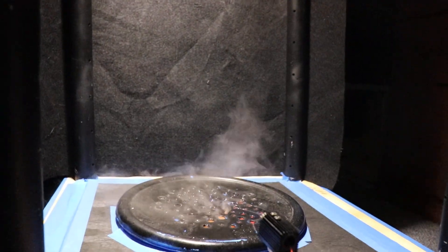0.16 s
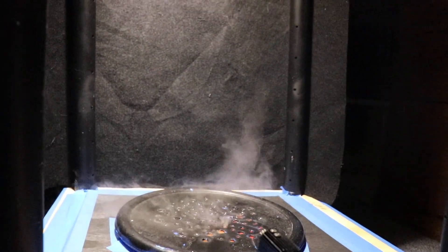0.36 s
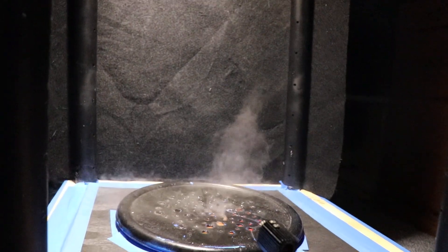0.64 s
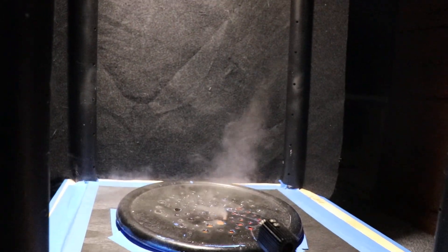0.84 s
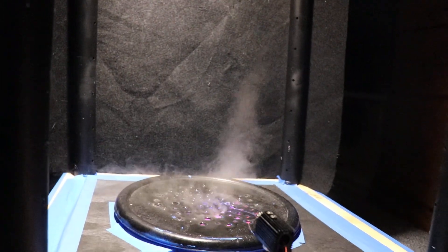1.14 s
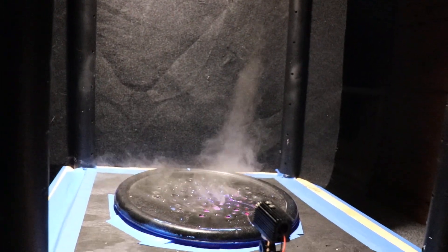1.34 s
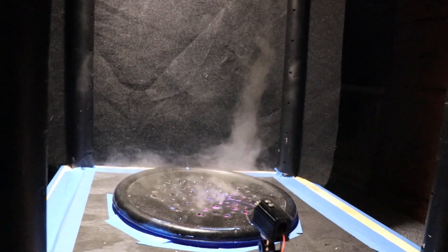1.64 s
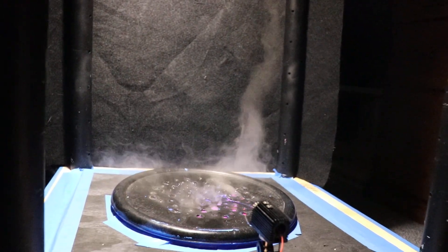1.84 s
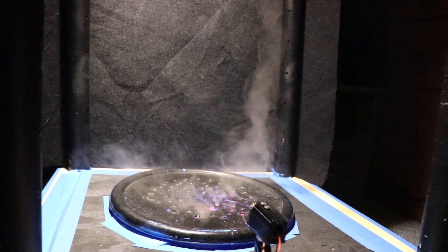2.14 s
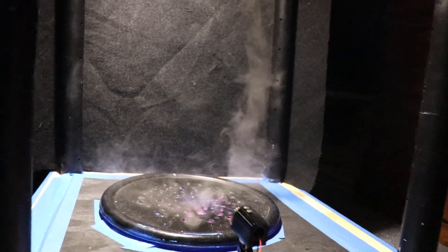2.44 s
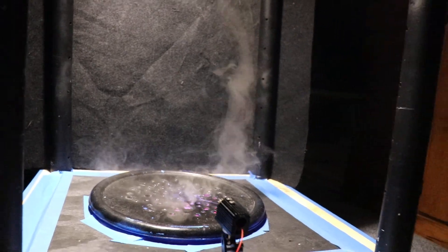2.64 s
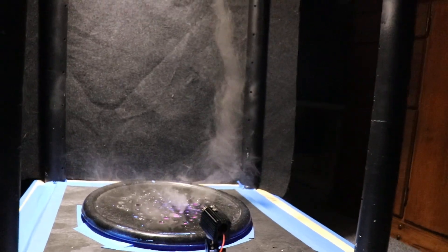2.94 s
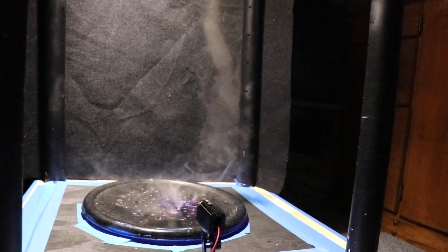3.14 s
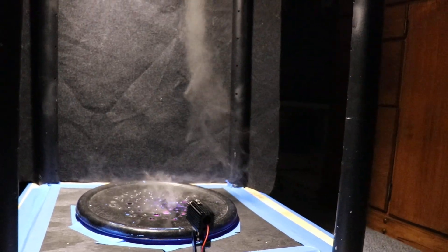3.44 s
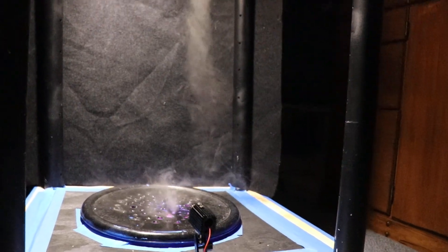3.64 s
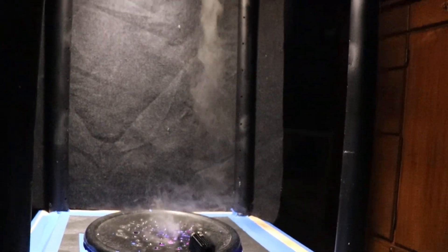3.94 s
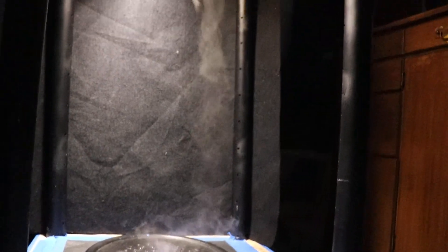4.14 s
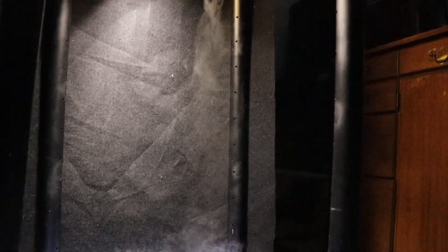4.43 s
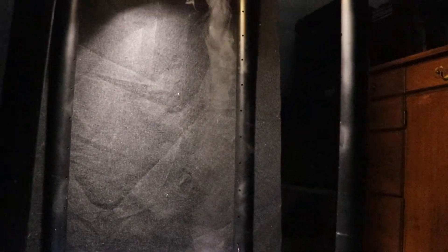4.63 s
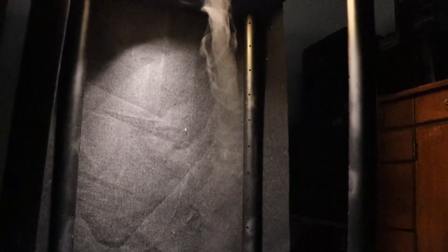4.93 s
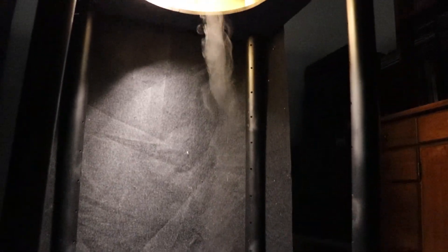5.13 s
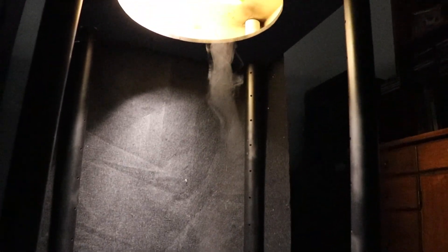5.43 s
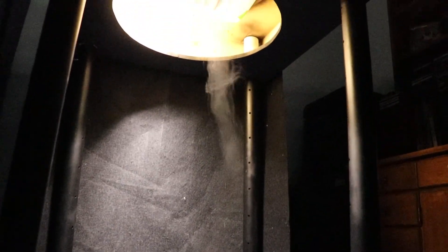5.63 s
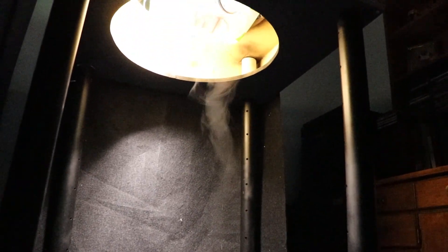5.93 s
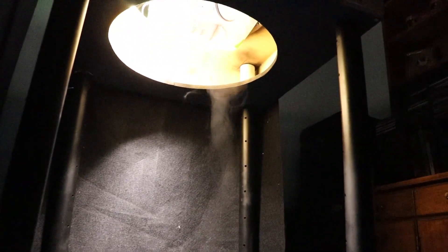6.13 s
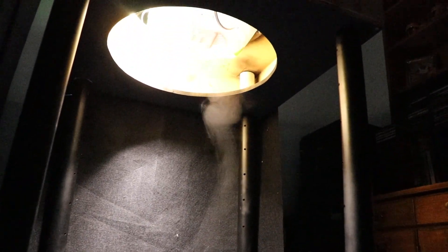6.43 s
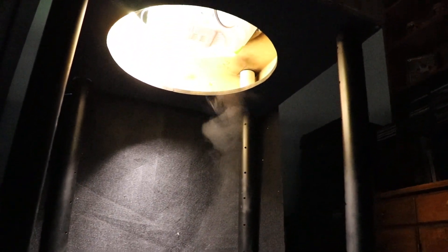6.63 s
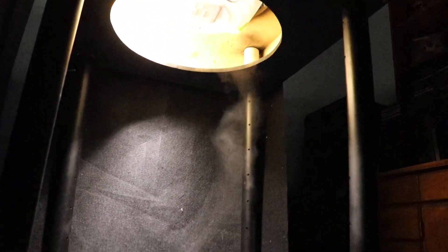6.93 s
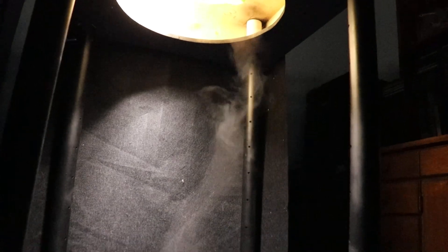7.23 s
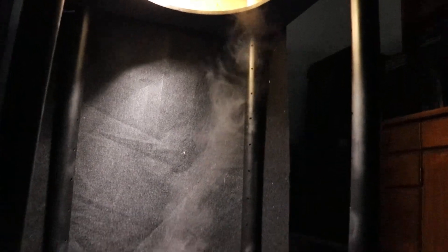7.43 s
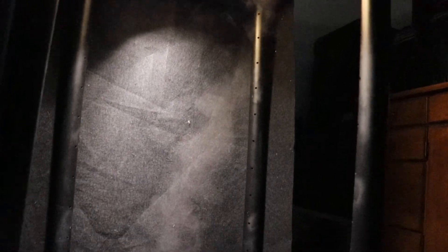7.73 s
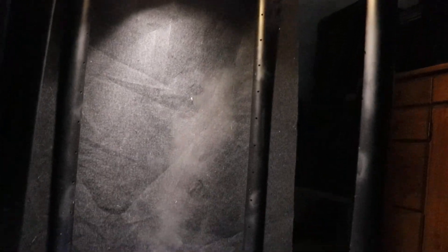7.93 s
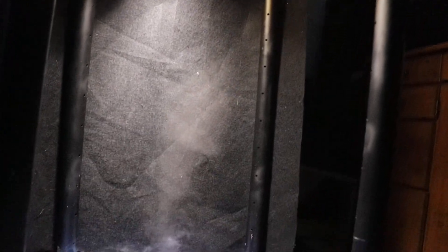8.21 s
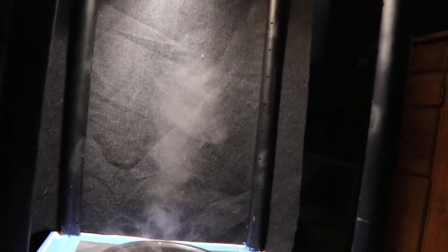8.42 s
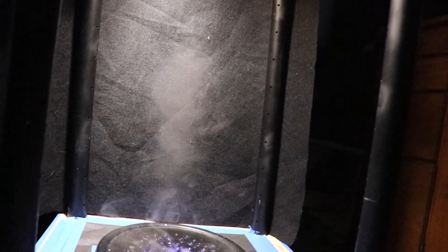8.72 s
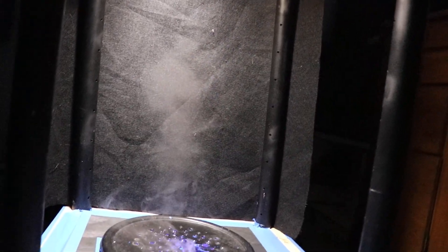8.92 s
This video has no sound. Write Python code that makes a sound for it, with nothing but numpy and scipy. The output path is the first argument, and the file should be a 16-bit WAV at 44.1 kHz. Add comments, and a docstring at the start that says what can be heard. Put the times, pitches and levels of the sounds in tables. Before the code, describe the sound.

A fan machine runs evenly in a room, whooshing and humming with soft hiss on top. A hard, loud double click switches it off, followed by a faint dull release. The rotor coasts down, its tones gliding lower into near quiet. Irregular watery plinks and dry ticks emerge, while a faint hollow drone grows as the handheld microphone moves toward the chamber top, then back.

```python
"""A homemade fog tornado indoors: a seven-blade fan draws mist up from a basin with an ultrasonic atomiser.
From the start, shaped noise and blade tones make the fan, over mains hum, room rumble and thin spray hiss.
Droplets keep falling back: short noise bursts tick on the lid, ringing bubbles plink in the water.
Near 2 s a double click of noise bursts through housing resonances switches the fan off; its noises and
tones sink as it coasts to rest at 9 s, while a hollow drone of narrow noise rises and handling bumps pass."""
import sys
import numpy as np
from scipy import signal
from scipy.fft import rfft, irfft
from scipy.io import wavfile

SR = 44100
rng = np.random.default_rng(int(sys.argv[2]) if len(sys.argv) > 2 else 0)


def int16_out(signal):
    """Quantize to a 16-bit WAV file."""
    q = np.round(np.clip(np.atleast_2d(signal).T, -1, 1) * 32767)
    wavfile.write(sys.argv[1], SR, q.astype(np.int16))


N = 399987
T = np.arange(N) / SR
CUTOFF_HZ = 15800   # top of the sound's band

# individually placed droplets that trap a bubble in the basin, level before the trims in drips():
# start_s [s], level_db [dB peak], bubble_hz [Hz]
DROPLETS = [(2.697, -36.5, 5350), (3.004, -34.5, 2620), (3.079, -33, 4910), (3.659, -36.5, 1700),
            (3.851, -36.5, 1693), (4.117, -27, 3310), (4.247, -34.5, 5270), (4.279, -37.5, 2190),
            (4.360, -36, 3420), (4.457, -39, 3460), (4.928, -43.5, 2110), (5.161, -38, 1660),
            (5.176, -35, 5310), (5.379, -37, 2300), (5.432, -32, 3120), (5.569, -38, 3580),
            (5.596, -37, 5280), (5.669, -39, 2400), (5.812, -32, 3400), (6.308, -40.5, 3120),
            (6.351, -41, 1620), (6.569, -36, 2320), (6.658, -41, 2220), (6.744, -43, 5200),
            (7.013, -38.5, 2390), (7.055, -38, 2400), (7.225, -38.5, 2390), (7.254, -31, 3560),
            (7.423, -41.5, 5270), (7.600, -42, 1754), (7.734, -41, 5700), (7.860, -43.5, 2210),
            (8.309, -38.5, 2050), (8.508, -36, 5200), (8.952, -38, 2320), (9.017, -38.5, 6320)]


def from_db(db):
    """Decibels to an amplitude factor."""
    return 10 ** (np.asarray(db) / 20)


def rms_one(x):
    """Scale a sound to rms 1."""
    return x / np.sqrt(np.mean(x ** 2) + 1e-20)


def in_time(rows):
    """A curve of (s, value) rows at every sample."""
    return np.interp(T, *np.transpose(rows))


def add(out, s, sound):
    """Mix a short sound in at time s."""
    i = int(np.clip(round(s * SR), 0, N - 1))
    out[i:i + len(sound)] += sound[:N - i]


def noise(spectrum):
    """Noise of rms 1 coloured by (Hz, relative dB) rows, falling away beyond its ends."""
    hz, db = np.transpose(spectrum)
    f = np.maximum(np.arange(N // 2 + 1) * SR / N, 1)
    skirts = np.minimum(f / hz[0], 1) ** 2 * np.minimum(hz[-1] / f, 1) ** 2
    colour = from_db(np.interp(np.log(f), np.log(hz), db))
    white = rfft(rng.standard_normal(N))
    return rms_one(irfft(white * skirts * colour, N))


def drift(rate_hz):
    """Random wandering of rms 1, mostly slower than the rate."""
    f = np.arange(N // 2 + 1) * SR / N
    return rms_one(irfft(rfft(rng.standard_normal(N)) / (1 + (f / rate_hz) ** 2), N))


def resonate(x, hz, width_hz):
    """A two-pole resonance with a gain of about 1 at its centre."""
    r, w = np.exp(-np.pi * width_hz / SR), 2 * np.pi * min(hz, CUTOFF_HZ) / SR
    zeros = np.array([1, 0, -1]) * (1 - r * r) / 2
    poles = [1, -2 * r * np.cos(w), r * r]
    return signal.lfilter(zeros, poles, x + 1e-18)


def tone(hz, waver_db):
    """A sine of rms 1 on a fixed or moving pitch, wavering in level around that."""
    phase = 2 * np.pi * (np.cumsum(hz * np.ones(N)) / SR + rng.random())
    return np.sqrt(2) * np.sin(phase) * from_db(waver_db * drift(0.93))


def fan():
    """Air drag slows the rotor once the power is cut; each part falls as a power of its speed."""
    off_s, coast_s, turns_hz = 1.982, 1.8, 48.68   # power cut, time to half speed, full shaft rate
    # blade tones at full speed: order [multiple of the shaft rate], level_db [dB rms]
    fan_orders = [(2, -46.5), (7, -38.5)]
    # motor whine while powered: pitch_hz [Hz], level_db [dB rms]
    motor_tones = [(430, -65), (600.5, -50), (828.3, -46.5), (948.3, -47.5), (1200, -54), (2632, -56)]
    # colour of the air through the chamber: freq_hz [Hz], level_db [relative dB]
    whoosh_colour = [(70, -19), (140, -13.5), (205, -9.5), (240, -0.5), (288, 1), (350, -7.5), (385, -3),
                     (440, -3), (500, -10), (720, -9.5), (860, -15.5), (1000, -13.5), (1250, -20),
                     (1900, -59)]
    # colour of the hiss at the blade tips: freq_hz [Hz], level_db [relative dB]
    hiss_colour = [(900, -20), (1400, 0.5), (1800, -1), (2150, -3.5), (2650, -0.5), (3400, 0.5),
                   (4000, -3.5), (4600, -10), (5500, -11), (6300, -16), (7500, -24), (10000, -26.5),
                   (16000, -32)]
    # blade overtones: order [multiple of the shaft rate]
    overtone_orders = [21, 28, 35]

    speed = 1 / (1 + np.maximum(T - off_s, 0) / coast_s)
    speed = speed * np.clip((9 - T) / 5, 0, 1)   # bearing friction finally stops it

    # noise levels are dB rms at full speed, here with gusts and flutter
    whoosh = from_db(-30 + 0.5 * drift(16)) * noise(whoosh_colour) * speed ** 2.8
    hiss = from_db(-37.5 + 1.0 * drift(10)) * noise(hiss_colour) * speed ** 3.46

    # even a weak draught keeps the air column humming
    column_hz = 257
    column = resonate(rng.standard_normal(N), column_hz, width_hz=23)
    column = rms_one(resonate(column, column_hz, width_hz=79))
    column = from_db(-42) * column * speed ** 1.4

    shaft_hz = turns_hz * speed * (1 + 0.00055 * drift(0.84))
    blades = sum(from_db(db) * tone(round(k) * shaft_hz, waver_db=1.5) for k, db in fan_orders)
    blades = blades * speed ** 4.5

    powered = np.clip((off_s - T) / 0.082 + 1, 0, 1)   # fades over 82 ms
    whine = powered * sum(from_db(db) * tone(hz * (1 + 0.00065 * drift(5.7)), waver_db=1.5)
                          for hz, db in motor_tones)

    # turbulence shakes the overtones' pitch as they sink through a resonance of the chamber
    overtones = sum(tone(k * shaft_hz * (1 + 0.0079 * drift(25.3)), waver_db=4.0) for k in overtone_orders)
    overtones = overtones * speed ** 1.9
    for _ in range(2):
        overtones = resonate(overtones, hz=860, width_hz=500)
    overtones = from_db(-54) * overtones
    return whoosh + hiss + column + blades + overtones + whine


def background():
    """Room rumble, air hiss and steady hums, a hollow drone of narrow noise, and soft handling bumps."""
    # rumble colour: freq_hz [Hz], level_db [relative dB]
    room_colour = [(12, 15.5), (19, 8), (29, -9), (80, -4), (140, -2), (210, -10), (275, -3.5), (350, -9),
                   (435, -6), (490, -6), (570, -5), (720, -8.5), (830, -18), (1500, -31.5)]
    # thin room hiss colour: freq_hz [Hz], level_db [relative dB]
    air_colour = [(600, -21), (1000, 4.5), (1500, 1.5), (2200, 1), (3500, -0.5), (4500, -4.5), (5400, -2),
                  (7000, -6.5), (9500, -7), (12000, -8.5), (16000, -8.5)]
    # mains hum and a slow appliance motor: pitch_hz [Hz], level_db [dB rms]
    hum_tones = [(39.4, -51.5), (59.9, -49.5), (180, -62.5), (300, -69), (420, -61.5), (900, -73.5),
                 (1020, -80), (1260, -82), (1380, -89), (1500, -86)]
    # hum near 120 Hz stands in the room, so its level changes with position: time_s [s], level_db [dB rms]
    buzz_curve = [(0, -59), (2.3, -56), (3, -52), (4.4, -56), (5.5, -54), (8, -51.5), (9.07, -60)]
    # drone, heard best near the top of the chamber: time_s [s], level_db [dB]
    drone_curve = [(0, -78), (3.9, -64), (4.6, -54.5), (8.3, -56), (9.07, -61)]
    # handling rumble: centre_s [s], half_length_s [s], level_db [dB]
    bump_list = [(2.547, 0.089, -28), (2.888, 0.1, -35.5), (3.273, 0.083, -35), (4.304, 0.048, -38),
                 (6.63, 0.062, -37)]

    rumble = from_db(-45.5) * noise(room_colour)
    air = from_db(-57) * noise(air_colour)
    hum = sum(from_db(db) * tone(hz, waver_db=3.0) for hz, db in hum_tones)
    buzz = from_db(in_time(buzz_curve)) * tone(119.3, waver_db=1)

    drone_hz = 589
    drone = resonate(rng.standard_normal(N), drone_hz, width_hz=8.4)
    drone = rms_one(resonate(drone, drone_hz, width_hz=193))
    drone = from_db(in_time(drone_curve)) * drone

    bumps = sum(from_db(db) * np.exp(-((T - s) / length) ** 2) for s, length, db in bump_list)
    handling = bumps * noise([(8, -9), (18, 10), (40, -26)])
    return rumble + air + hum + buzz + drone + handling


def spray():
    """The atomiser's spray is a thin treble hiss that flickers."""
    # colour: freq_hz [Hz], level_db [relative dB]
    spray_colour = [(4000, -14), (7300, -4.5), (8600, -9), (9450, -1), (10000, -7), (10800, -3.5),
                    (11250, 0.5), (11900, -5), (12350, 2), (12700, -7), (14500, -6), (16000, -14)]
    # level before the flicker, louder close to the basin: time_s [s], level_db [dB rms]
    spray_curve = [(0, -63), (2, -61.5), (3, -61.5), (4.2, -62), (4.8, -66), (6, -75), (7.5, -71),
                   (8.4, -61.5), (9.07, -65)]
    return from_db(in_time(spray_curve) + 1.4 * drift(40)) * noise(spray_colour)


def shower(per_s, db, hz):
    """Small droplets at uneven moments, of varied size and pitch: rows of (s, level dB, Hz)."""
    size_spread_db, pitch_spread_octaves = 4.5, 0.86   # furthest stray either way
    count = 200
    wait, size, pitch = rng.random((count, 3)).T
    s = np.cumsum(2 * wait) / per_s
    level_db = db + size_spread_db * (2 * size - 1)
    pitch_hz = hz * 2 ** (pitch_spread_octaves * (2 * pitch - 1))
    return np.transpose([s, level_db, pitch_hz])[s < N / SR]


def rebounds():
    """A big drop throws up a smaller one, which falls back a moment later: rows of (s, level dB, Hz)."""
    s, db, hz = np.transpose(DROPLETS)
    wait, pitch = rng.random((len(s), 2)).T
    later_s = s + 0.017 * (.5 + wait)
    pitch_hz = hz * 2 ** (0.32 * (2 * pitch - 1))   # up to 0.32 octave either way
    return np.transpose([later_s, db - 11, pitch_hz])


def plink(hz, cycles, glide, swell_s, wobble):
    """A bubble swells and rings, peak near 1; churned water makes it wobble while its pitch shifts."""
    t, t60 = T[:SR // 12], cycles / hz
    churn = np.interp(t, t[::80], rng.standard_normal(len(t[::80])))
    envelope = (1 - np.exp(-t / swell_s)) * from_db(-60 * t / t60)
    phase = 2 * np.pi * np.cumsum(hz * (1 + glide * np.minimum(t / t60, 1))) / SR
    ring = np.sin(phase) + wobble * churn * np.sin(phase + np.pi / 3)
    return envelope / envelope.max() * ring / np.sqrt(1 + wobble ** 2)


def tick(hz, breadth, t60):
    """A short splat: a decaying noise burst resonating around one pitch; peak 1."""
    t = T[:SR // 14]
    spatter = rng.standard_normal(len(t)) * from_db(-60 * t / t60)
    sound = resonate(resonate(spatter, hz, breadth * hz), hz, 2.5 * hz)
    return sound / np.abs(sound).max()


def drips():
    """Droplets splash into the water and leave a ringing bubble; fainter ones spatter at random."""
    out = np.zeros(N)
    drops = [*DROPLETS, *rebounds(), *shower(per_s=7, db=-48, hz=3300)]
    chance = rng.standard_normal((len(drops), 2))
    for (s, db, hz), (damping_db, glide) in zip(drops, chance):
        cycles = 65 * from_db(damping_db)   # cycles until 60 dB down
        bubble = plink(hz, cycles, glide=0.042 * glide, swell_s=0.00086, wobble=0.21)
        splash = tick(hz, breadth=0.079, t60=0.028)
        add(out, s, from_db(db - 2.5) * bubble)
        add(out, s, from_db(db - 4) * splash)

    faint_per_s = 12
    for when, size, strength in rng.random((int(faint_per_s * N / SR), 3)):
        splat = tick(2000 * 3 ** size, breadth=0.29, t60=0.035)   # 2 to 6 kHz
        add(out, when * N / SR, from_db(-50 + 20 * (strength - .5)) * splat)
    return out


def lid_ticks():
    """Droplets that land on the lid make only a dry tick."""
    # individually placed ticks: start_s [s], level_db [dB peak], centre_hz [Hz]
    tick_list = [(.736, -31.5, 9900), (.838, -38, 14000), (.924, -32, 6660), (1.286, -36, 9600),
                 (2.727, -30, 9700), (3.001, -34, 7900), (4.103, -40, 10500), (4.323, -36, 9500),
                 (5.822, -31.5, 2780), (6.25, -38.5, 4400), (6.931, -34, 3230), (7.598, -42, 3500),
                 (7.793, -44, 3300), (8.286, -40, 2980)]
    out = np.zeros(N)
    for s, db, hz in [*tick_list, *shower(per_s=3.6, db=-46.5, hz=5400)]:
        add(out, s, from_db(db) * tick(hz, breadth=0.12, t60=0.0091))
    return out


def switch():
    """Each contact grinds for an instant, then its chatter dies away; both ring the plastic housing."""
    # contacts, pressed and let go: start_s [s], level_db [nominal peak dB], grind_s [s],
    # chatter_t60_s [s], brightness_hz [Hz]
    contacts = [(1.915, -21, 0.0018, .02, 6000), (1.9217, -7, 0.0011, 0.024, 9000),
                (1.950, -2.5, 0.002, 0.011, 8000), (2.189, -21, 0.0051, .015, 1200)]
    # housing resonances: pitch_hz [Hz], level_db [relative dB], t60_s [s]
    housing_modes = [(550, -11, 0.018), (736, -6, 0.022), (1310, -6, 0.018), (1940, 3, 0.0073),
                     (2200, 1, 0.008), (2860, 7.5, 0.0072), (3920, -4, 0.026), (4460, -10, 0.0048),
                     (5330, 3, 0.0082), (6270, 4, 0.0041), (7100, -17, .005), (7850, -22, .006),
                     (9050, -28, 0.0041), (9600, -13, 0.0038), (13000, -11, 0.0032), (14300, -21, 0.0027)]
    chatter, crest_db = 0.49, 6.5   # chatter strength beside the grind; allowance from peak to rms
    out, t = np.zeros(N), T[:SR // 10]
    for s, db, grind_s, t60, bright_hz in contacts:
        strength = np.where(t < grind_s, 1, chatter * from_db(-60 * (t - grind_s) / t60))
        sound = np.zeros(len(t))
        # every mode takes its own share of the blow's energy
        for hz, level_db, ring_s in housing_modes:
            force = rng.standard_normal(len(t)) * strength
            width_hz = np.log(1000) / np.pi / ring_s
            sound += from_db(level_db) * rms_one(resonate(force, hz, width_hz))
        # the bare crack of the contacts, beside the ring of the housing
        crack = resonate(rng.standard_normal(len(t)) * strength, hz=1700, width_hz=2200)
        sound += from_db(1) * rms_one(crack)
        # a soft contact is duller
        sound = signal.lfilter([1], [1, -np.exp(-2 * np.pi * bright_hz / SR)], sound)
        blow_rms = np.sqrt(np.mean(strength ** 2))
        add(out, s, from_db(db - crest_db) * rms_one(sound) * blow_rms)
    return out


def chamber(x, t60, tail_db):
    """Early echoes from the chamber walls over the short decaying tail of the room."""
    # nearby walls: delay_s [s], gain [amplitude factor]
    wall_echoes = [(.0013, 0.063), (.0029, 0.11), (.0047, .22), (.0078, 0.048)]
    t = T[:SR // 2]
    tail = rng.standard_normal(len(t)) * from_db(-60 * t / t60) * (1 - np.exp(-t / 0.0018))
    response = from_db(tail_db) * tail / np.sqrt(np.sum(tail ** 2))
    response[0] += 1   # direct sound
    for delay_s, gain in wall_echoes:
        add(response, delay_s, np.array([.25, .5, .25]) * gain)   # slightly dulled echo
    return signal.fftconvolve(x, response)[:N]


def scene():
    """Everything reaches both channels alike, but for a trace of noise in opposite phase."""
    droplets = chamber(drips() + lid_ticks(), t60=0.054, tail_db=-7.0)
    clicks = chamber(switch(), t60=0.12, tail_db=-17.0)
    mid = fan() + background() + spray() + droplets + clicks
    side_colour = [(40, 8), (300, 3.0), (1000, -4.0), (4000, -10), (9000, 5.5), (15000, 9.5)]
    side = from_db(-74) * noise(side_colour)
    return np.array([mid + side, mid - side])


def record(dry):
    """Peaks are clipped at full scale, then the top is cut steeply."""
    low_pass = signal.ellip(12, .1, 80, CUTOFF_HZ, fs=SR, output="sos")
    return signal.sosfilt(low_pass, np.clip(dry, -1, 1))


dry = scene()
out = record(dry)
int16_out(out)
```